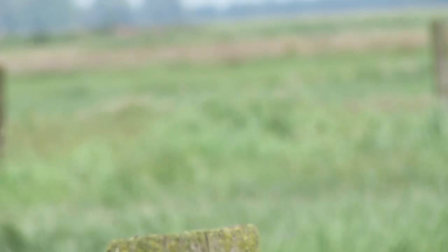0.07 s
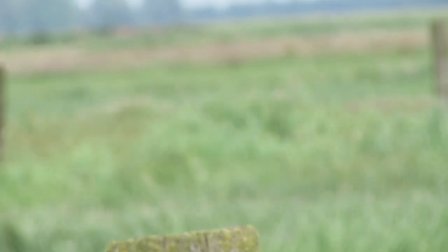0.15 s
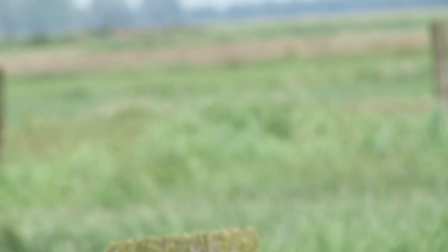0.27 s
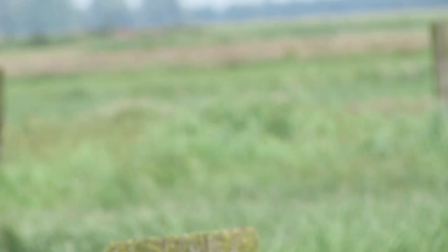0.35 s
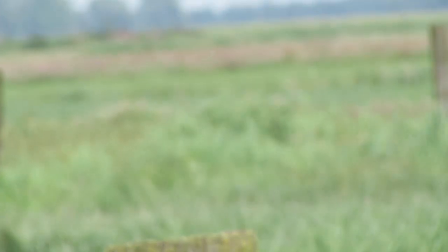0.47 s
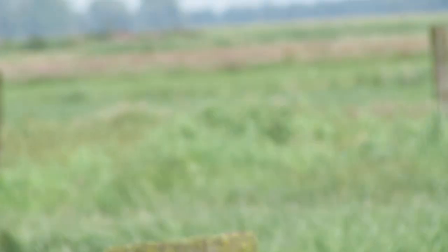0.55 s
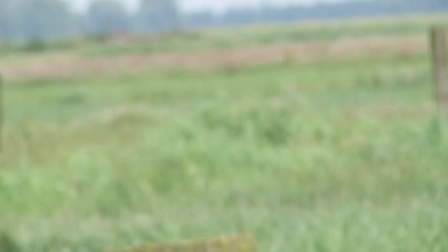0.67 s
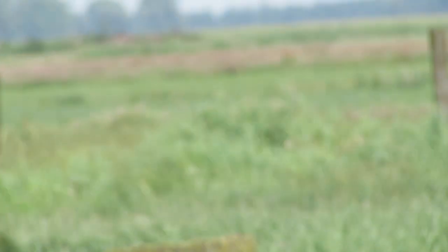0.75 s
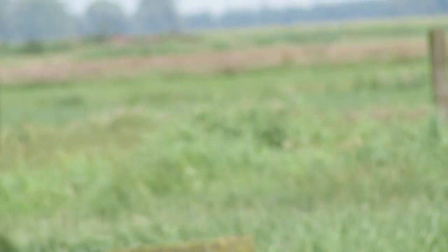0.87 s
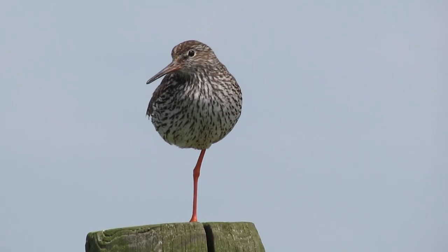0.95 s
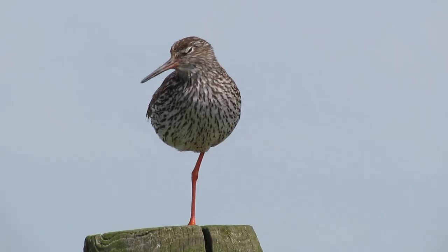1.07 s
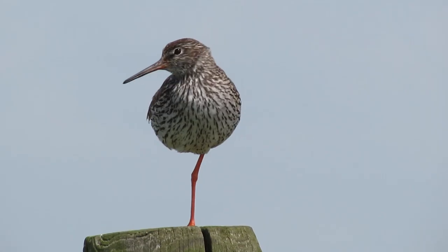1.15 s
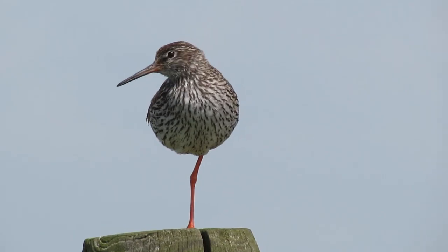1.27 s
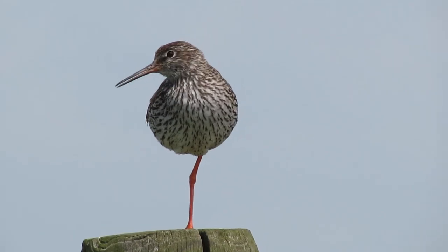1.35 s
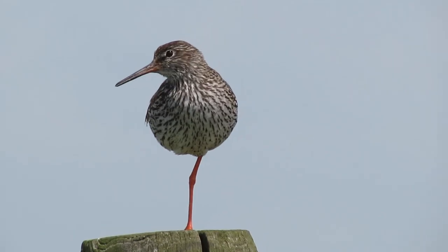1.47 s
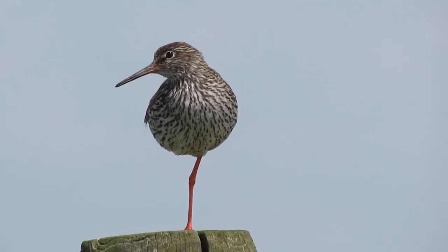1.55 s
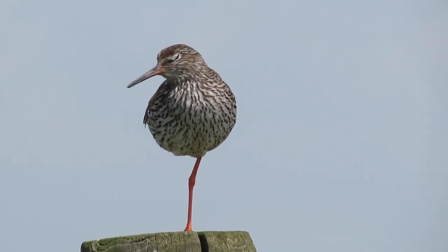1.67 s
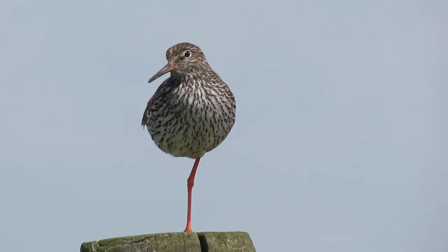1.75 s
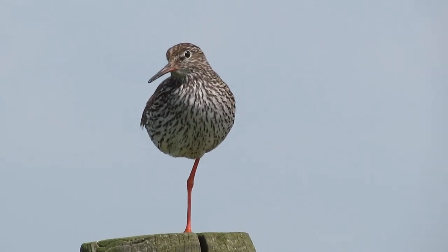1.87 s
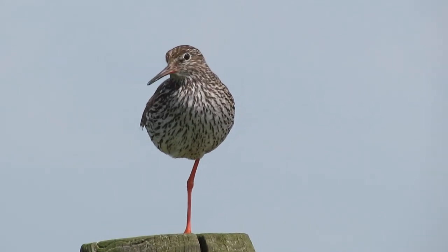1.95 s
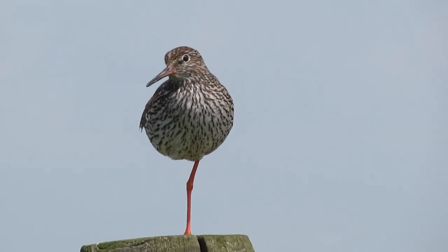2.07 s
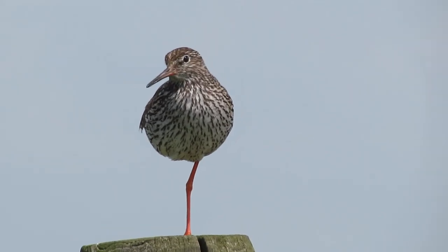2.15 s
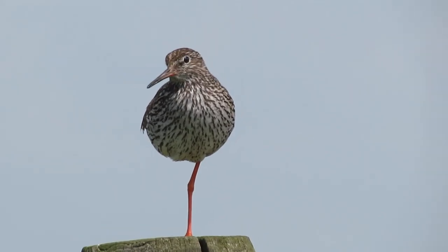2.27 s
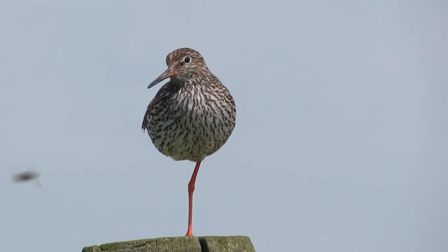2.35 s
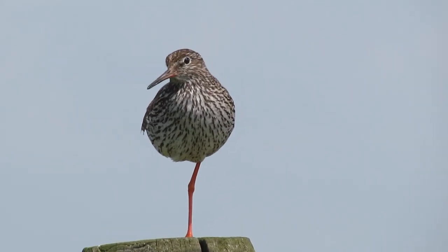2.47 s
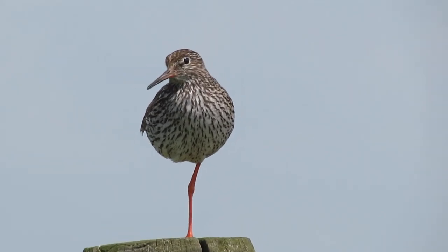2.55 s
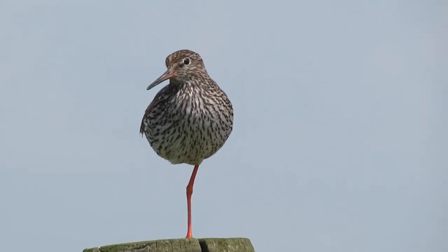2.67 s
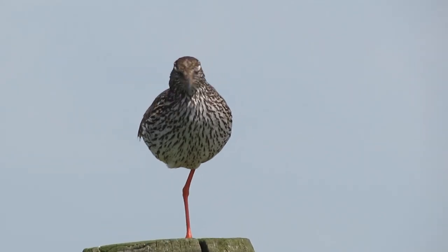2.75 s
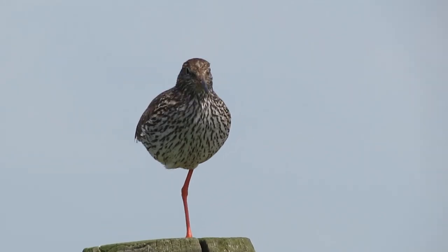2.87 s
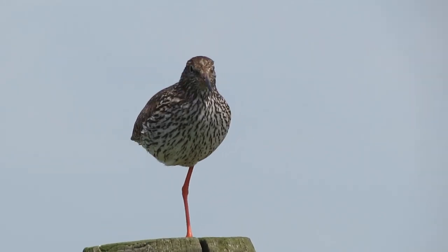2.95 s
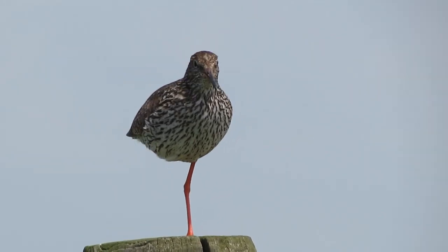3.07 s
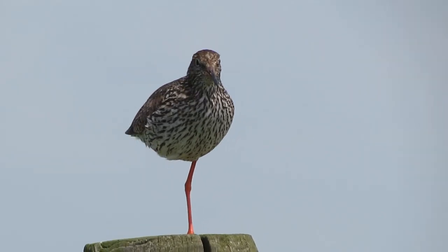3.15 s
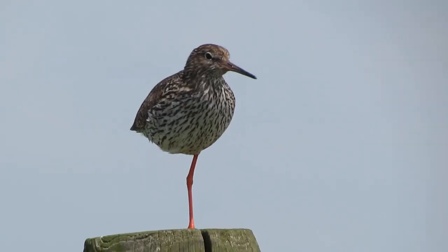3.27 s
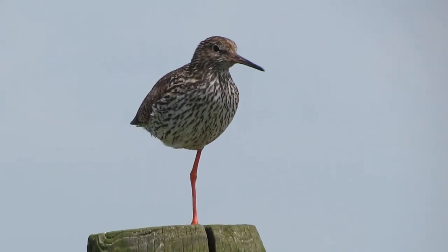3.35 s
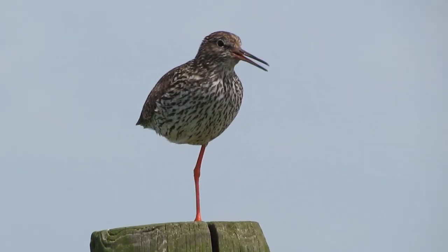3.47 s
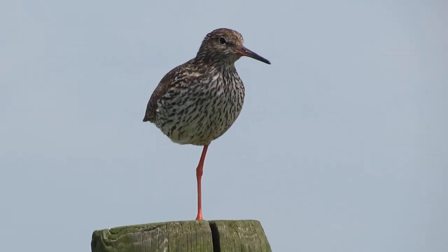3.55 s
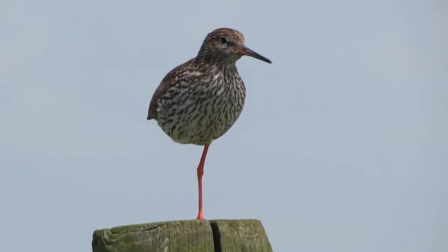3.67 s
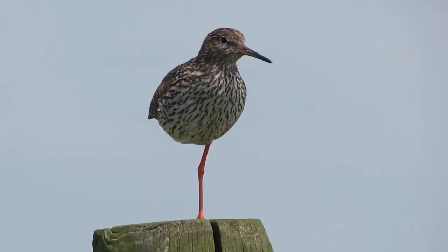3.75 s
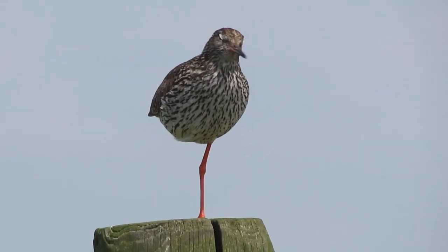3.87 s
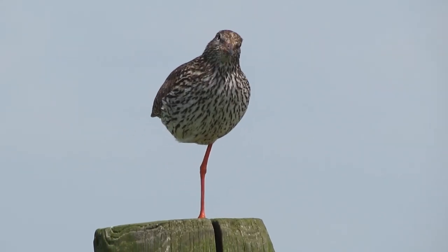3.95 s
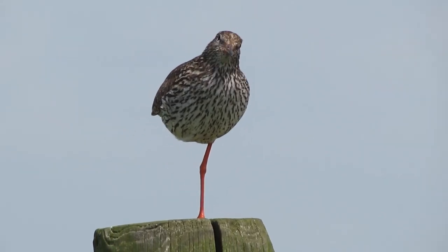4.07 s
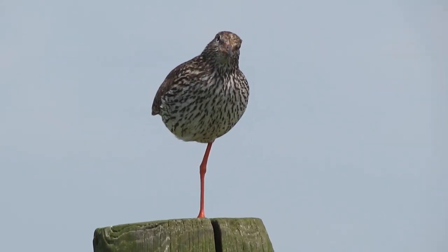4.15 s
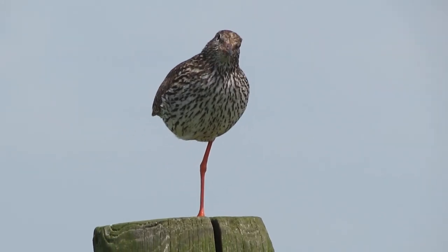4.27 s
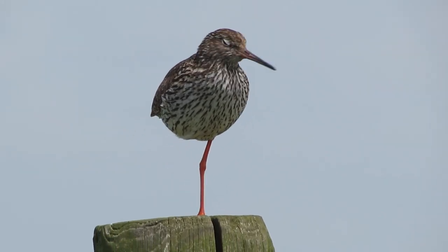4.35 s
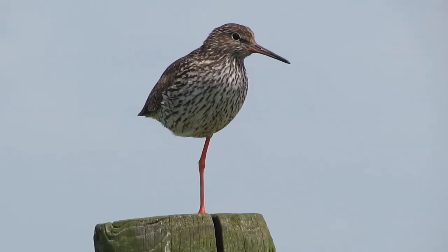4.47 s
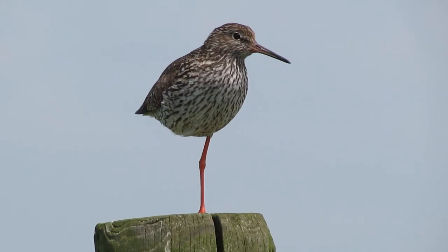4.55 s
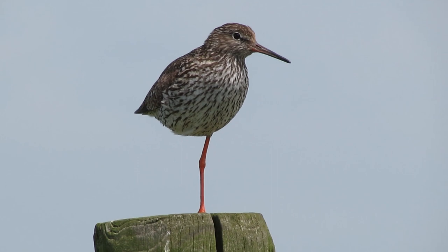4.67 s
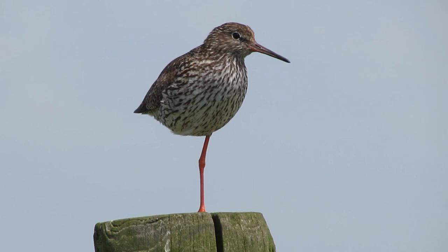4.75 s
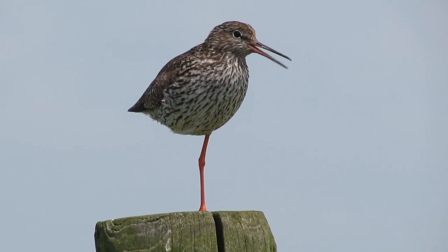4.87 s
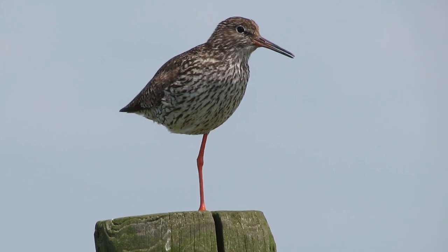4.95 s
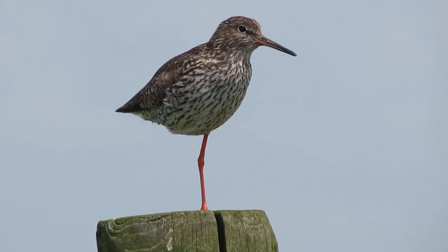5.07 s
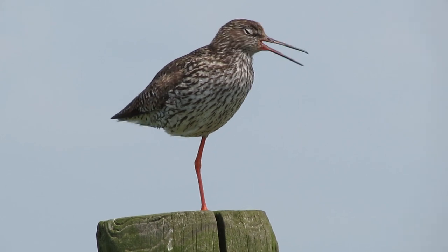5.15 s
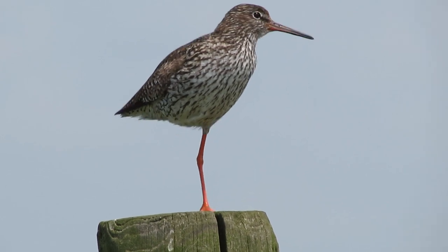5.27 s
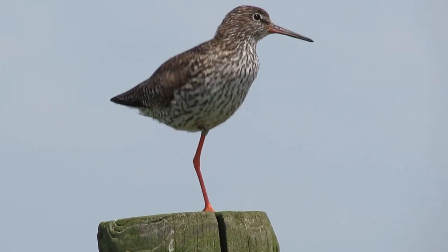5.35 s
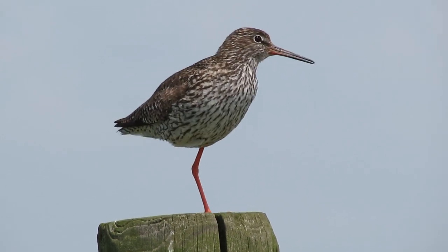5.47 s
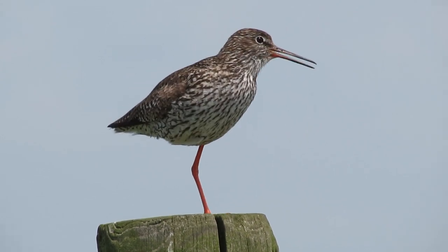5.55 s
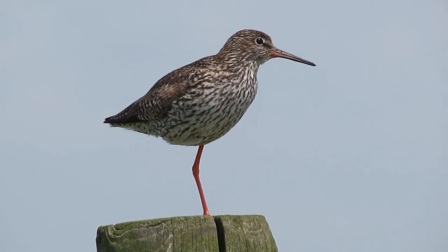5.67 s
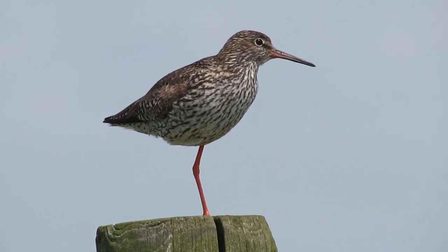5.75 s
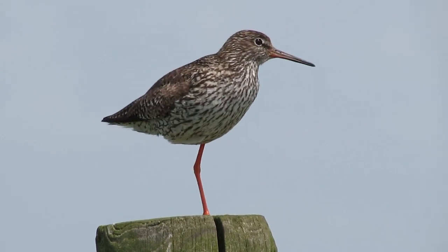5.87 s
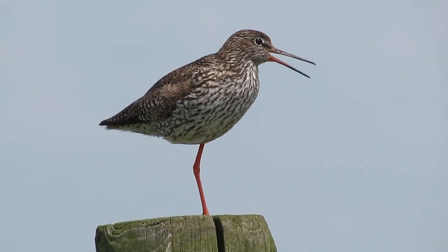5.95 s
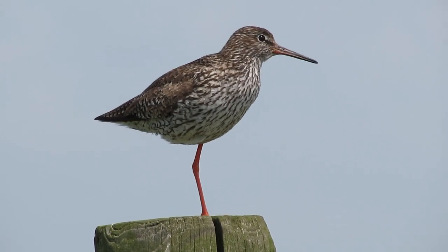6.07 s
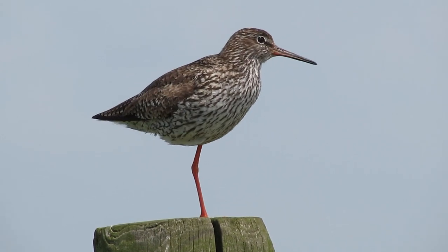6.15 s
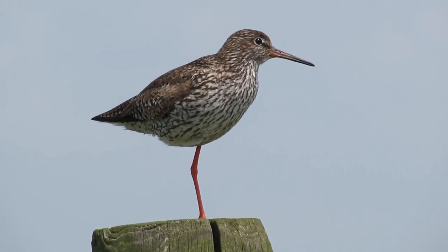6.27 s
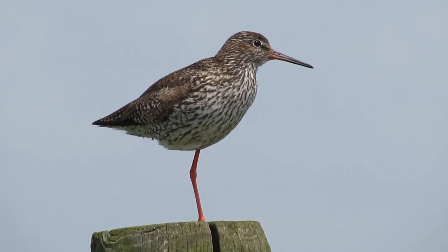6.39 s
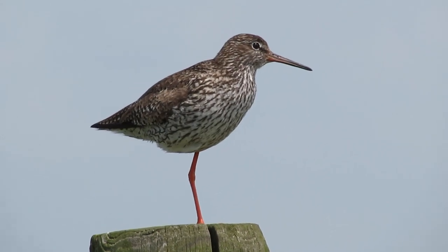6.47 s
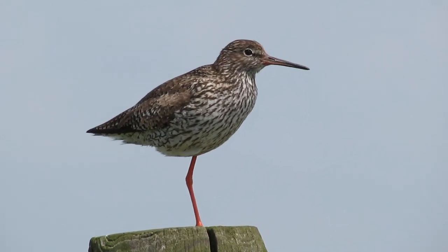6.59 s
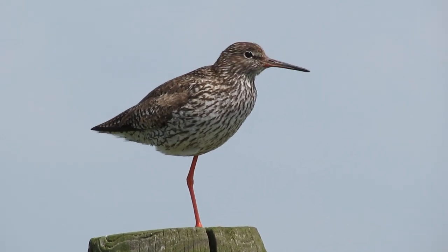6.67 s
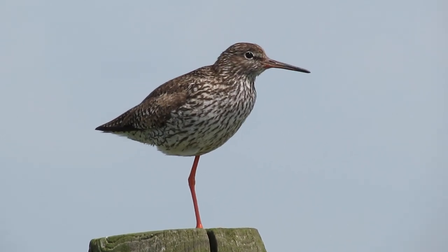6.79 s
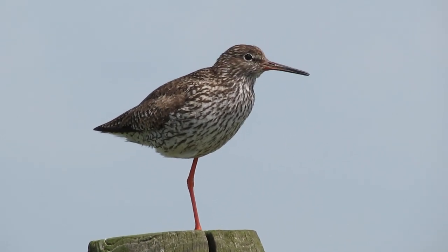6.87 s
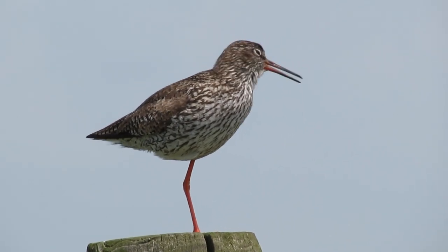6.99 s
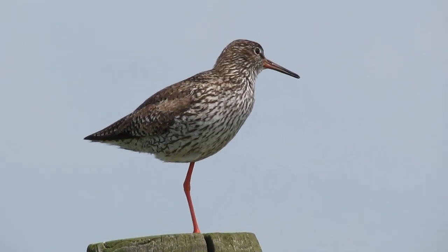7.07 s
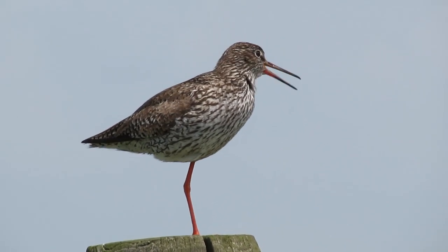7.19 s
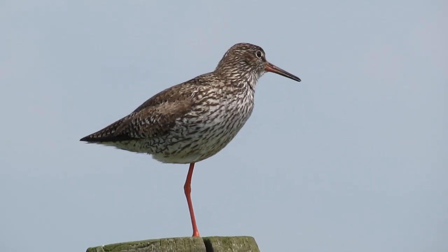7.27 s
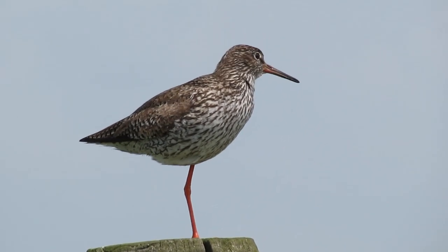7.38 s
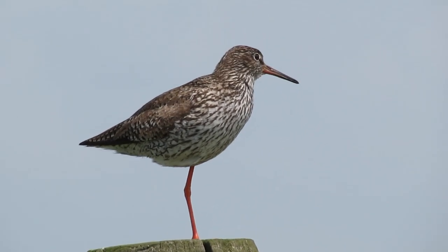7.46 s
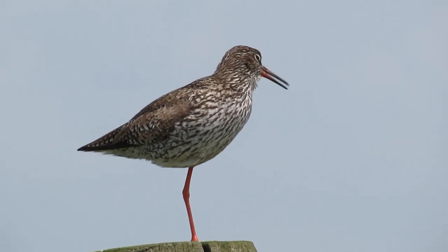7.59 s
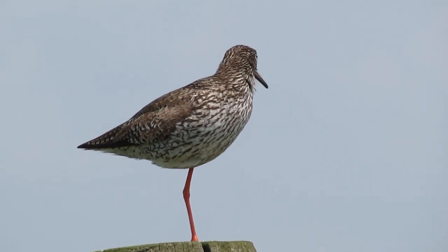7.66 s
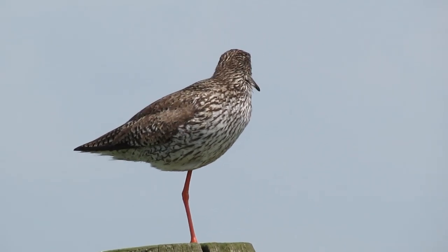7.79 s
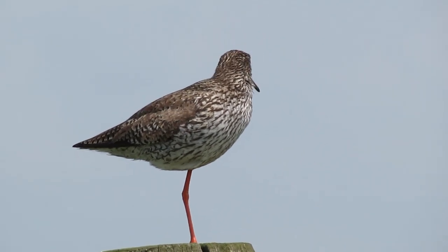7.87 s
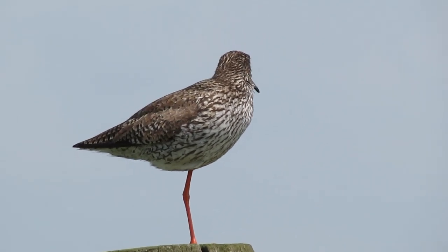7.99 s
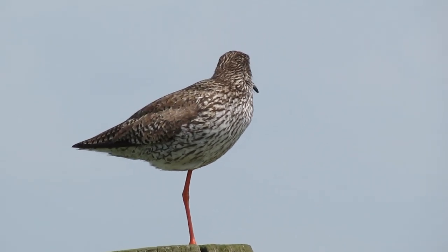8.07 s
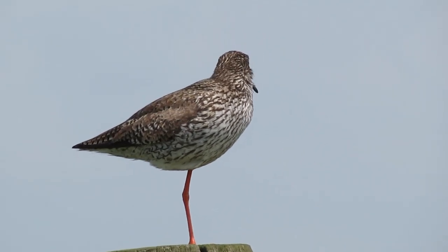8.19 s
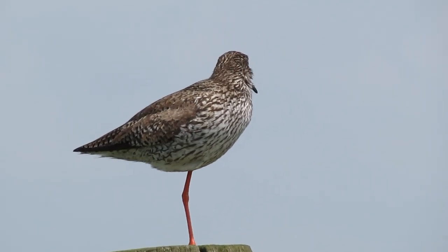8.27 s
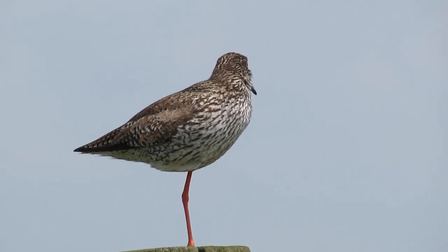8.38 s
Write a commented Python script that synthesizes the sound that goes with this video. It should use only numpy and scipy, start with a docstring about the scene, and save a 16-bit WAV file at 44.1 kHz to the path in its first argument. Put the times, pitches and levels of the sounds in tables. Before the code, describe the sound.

Loud, clipped, high wader alarm notes repeat at uneven gaps, each a quick rasp snapping into a falling whistle, above a faint breezy meadow.

```python
"""Light wind, a far engine and a soft hiss open the scene, and almost at once a redshank calls from a fence post.
It gives twelve sharp alarms: a rising rasp that breaks up, a thin squeak, and a loud falling whistle.
Far meadow birds slur, trill and chirp behind it, and one dry tick sounds midway.
The voices are sliding sine waves; the rasp also rings a throat of resonances. Wind and hiss are coloured
noise, the engine is two low tones, and the tick is a few dying tones with short bursts of noise."""
import sys
import numpy as np
from scipy import signal
from scipy.fft import rfft, irfft
from scipy.io import wavfile

SR = 44100
rng = np.random.default_rng(int(sys.argv[2]) if len(sys.argv) > 2 else 0)


def materialize(psi):
    """Save the field psi as 16-bit PCM at rate SR to the path in sys.argv[1].

    A 1-D psi becomes a single channel; in a 2-D psi each row is a channel.
    """
    bounded = np.clip(np.atleast_2d(psi).T, -1, 1)
    quanta = np.round(bounded * 32767).astype(np.int16)
    wavfile.write(sys.argv[1], SR, quanta)


N = 371322
TIME = np.arange(N) / SR  # s
TOP_HZ = 15200  # upper limit of the sound

# wind over the meadow, its tone colour: f/Hz, relative level/dB
WIND_COLOUR = [(10, -25.5), (25, -4), (65, -0.5), (105, -5), (170, -0.5), (280, -7.5), (420, -12),
               (750, -17), (1050, -16.5), (1500, -24), (2200, -26.5), (4000, -57.5)]
# hiss, its tone colour: f/Hz, relative level/dB
HISS_COLOUR = [(500, -26), (1000, -4), (1600, -4.5), (2700, -2), (4000, -2.5), (5500, -3), (8000, -6.5),
               (12000, -12), (13500, -16.5), (15000, -38.5)]
# breeze: t/s, level of its rush/dB
BREEZE_LEVEL = [(0, -62.5), (.9, -60), (1.8, -58), (2.6, -56), (3.1, -60.5), (3.5, -54.5), (4.25, -51),
                (4.8, -57.5), (6.3, -60), (6.8, -56.5), (8.42, -57)]
# far engine: t/s, firing rate f/Hz, level/dB
ENGINE_COURSE = [(0, 64.14, -62), (.9, 66.37, -60), (1.1, 64.94, -55), (4, 64.69, -62.5),
                 (6.4, 67.43, -60.5), (7.45, 66.95, -55), (7.9, 85.1, -53), (8.42, 77.27, -57)]
# alarm calls: start t/s, wait until whistle t/s, whistle length t/s, squeak f/Hz, whistle start f/Hz,
#  rasp level/dB (before the throat), whistle level/dB, whistle fade/dB, overtone boost/dB, left minus right/dB
ALARM_CALLS = [ (0.0392, 0.02515, 0.02495, 5248, 3486, -31.5, -25.5, 7, -18, -9),
               (1.081, 0.02996, 0.0232, 5257, 2906, -26.5, -16, 17.5, -10.5, -3.5),
               (1.485, .0262, 0.0309, 5230, 2924, -25, -22, 14.5, 0.5, -2),
               (3.110, .0262, 0.0192, 5239, 2855, -23.5, -19.5, 8, -2.5, -2.5),
               (3.554, 0.0315, 0.0223, 5068, 2895, -24.5, -21, 8, -3, -3),
               (4.97, 0.0283, 0.0318, 5089, 2820, -24.5, -21.5, 9.5, -1.5, -3),
               (5.243, 0.0285, 0.0412, 5010, 2831, -23.5, -19, 12, -1, -3.5),
               (5.623, 0.0263, 0.0327, 5015, 2958, -25.5, -15.5, 14, -3, -2.5),
               (6.041, .0282, 0.0236, 5080, 2944, -22, -14.5, 13, 0, -3),
               (7.0358, 0.02516, 0.03635, 5007, 2867, -22, -17.5, 9, 2, -3),
               (7.2826, 0.02643, 0.0399, 4978, 2946, -25.5, -11.5, 13.5, -3, -0.5),
               (7.67, 0.02797, 0.0255, 4941, 2941, -24, -10, 18.5, -2.5, -1.5)]
# course of one rasp: share of its length (0-1), pitch f/Hz, relative level/dB, roughness (0-1)
RASP_COURSE = [(0, 887.5, -12, 0.05), (.2, 991.5, -3.5, .05), (.38, 1206, -4.5, 0.02), (.5, 1397, 1.5, .14),
               (.6, 1735, 2.5, 0.32), (.72, 2178, -2, 0.08), (1, 2226, -11.5, 0)]
# resonances of throat and open bill: f/Hz, width f/Hz, level/dB
THROAT_RESONANCES = [(1051, 216, -12.5), (2211.7, 267, 1.5), (2780, 310, 4.5), (3598, 421, 1),
                     (4448, 75, 6.5), (5214, 287, -1.5), (6512, 467, 0), (7960, 1110, -6.5),
                     (10330, 3530, -13)]
# the bill points at the microphone, then away: t/s, treble level/dB
BILL_FACING = [(0, 0), (1.5, 0), (3.1, 3.5), (5, -2), (8, -3.5)]
# far whistled notes: start t/s, length t/s, start f/Hz, end f/Hz, level/dB before the cut in far_birds,
#  bend (above 0 the slide levels off, below 0 it steepens)
FAR_SLURS = [ (0.139, 0.0287, 3100, 2777, -50, 0.5), (0.674, 0.041, 3300, 3067, -52, -.5),
             (1.343, 0.042, 4116, 4375, -52, 4.5), (1.772, 0.1256, 4020, 3650, -57.5, -6.5),
             (1.826, 0.0224, 3020, 3118, -45, 0.5), (1.858, 0.0193, 3020, 3110, -44.5, -2),
             (1.868, .053, 4620, 4220, -56.5, -1.5), (2.015, 0.13, 4390, 3706, -50.5, 3),
             (2.239, .134, 4550, 4220, -58, 0.23), (3.295, .14, 4970, 3980, -59.5, 2.5),
             (3.498, 0.148, 4900, 3896, -58, 1), (3.7, 0.0656, 3565, 3290, -54.5, -1),
             (4.233, 0.16, 4030, 3680, -60, -2), (4.514, 0.129, 4300, 3658, -54, 1.5),
             (4.612, 0.111, 3470, 3439, -55, 2.5), (5.471, 0.05, 3450, 2148, -44, 0.42),
             (5.504, 0.15, 2400, 2208, -47, 8.5), (6.572, .136, 4850, 3870, -61, 3.5),
             (7.152, 0.046, 4580, 4340, -55.5, 0.04), (7.24, 0.067, 3480, 3500, -53.5, 10),
             (7.778, .183, 4650, 3947, -59.5, 2.5), (7.994, .158, 4700, 3835, -50.5, 2),
             (8.088, 0.18, 3100, 2190, -58.5, 7), (8.318, .124, 4600, 3640, -55.5, 2)]
# far trills: start t/s, length t/s, start f/Hz, end f/Hz, level/dB before the cut in far_birds
FAR_TRILLS = [ (0.756, 0.202, 3520, 3440, -52), (3.43, 0.077, 4250, 3990, -50),
              (3.851, .143, 4350, 4316, -54.5), (5.186, 0.111, 4500, 4612, -49),
              (6.156, 0.0766, 3520, 3320, -52.5), (6.758, .072, 4520, 4550, -54)]
# runs of one repeated chirp: start t/s, number of notes, period t/s, note length t/s, start f/Hz, end f/Hz,
#  level/dB before the cut in far_birds
FAR_CHIRP_RUNS = [(0.262, 3, .133, .076, 4665, 5307, -64), (2.495, 3, 0.087, .055, 2930, 3274, -61.5),
                  (2.526, 3, .09, .035, 3263, 2190, -55.5)]
# parts of the dry tick: start t/s, ring f/Hz, decay t/s, level/dB
TICK_PARTS = [(4.8728, 3190, 0.00055, -32.5), (4.8722, 910, 0.00085, -32), (4.8765, 231.6, 0.0019, -34.5)]

RUMBLE_DB = -57
HISS_DB, HISS_STEP_S, HISS_BEFORE_DB, HISS_RAMP_S = -58, 0.931, -63.5, 0.045  # the hiss steps up once, early on
LEAP_SHARE = .73  # the rasp leaps to the squeak this far on the way to the whistle
SQUEAK_DB, HUSK_DB = -5.5, -11.5  # squeak and the whistle's rush of air, relative to the rasp
SQUEAK_SAG, SQUEAK_OVERLAP_S = .03, .003  # share of pitch lost along the squeak; extra length
SETTLE_RATIO = .499  # the whistle settles an octave under the squeak
WHISTLE_ATTACK_S, WHISTLE_RELEASE_S = 0.00568, 0.00438
TRILL_HZ, TRILL_UNEVEN = 45.9, 0.193  # beat rate; how unsteady it is, as a share
TRILL_DEPTH, TRILL_SWING = 0.904, 0.038  # shares of level and pitch
TRILL_BEND = 2.8  # trills and twitter slide quickly at first and then level off
TWITTER_PER_S, TWITTER_DB = 6.7, -63  # notes per second; level before the cut in far_birds
TWITTER_HZ, TWITTER_OCTAVES = 4365, .25  # middle pitch; random shift up or down
TWITTER_S, TWITTER_SLIDE_OCTAVES = 0.0367, 0.1117  # middle length (half to double); largest slide


def undb(db):
    """Decibels to gain."""
    return 10 ** (np.asarray(db) / 20)


def unit(x):
    """Scale to an rms (average strength) of 1."""
    return x / np.sqrt(np.mean(x ** 2))


def shape(hz, points):
    """Gain at the given frequencies, read from a list of (f/Hz, level/dB)."""
    f, db = np.transpose(points)
    return undb(np.interp(np.log(np.maximum(hz, 1)), np.log(f), db))


def colour(x, points):
    """Filter by a list of (f/Hz, level/dB)."""
    n = x.shape[-1]
    hz = np.arange(n // 2 + 1) * SR / n
    return irfft(rfft(x) * shape(hz, points), n)


def walk(rate, size):
    """Smooth chance with spread near 1, heading for a new value `rate` times a second."""
    place = np.arange(size) * rate / SR
    return np.interp(place, np.arange(size), rng.standard_normal(size))


def gate(t, length, rise, fall):
    """A note's outline with rounded start and end."""
    opening = np.sin(np.pi / 2 * np.clip(t / rise, 0, 1))
    closing = np.sin(np.pi / 2 * np.clip((length - t) / fall, 0, 1)) ** 2
    return opening * closing


def glide(share, start_hz, end_hz, bend):
    """Exponential slide between two pitches."""
    return start_hz + (end_hz - start_hz) * np.expm1(-bend * share) / np.expm1(-bend)


def turn(hz):
    """Phase of a moving pitch."""
    return 2 * np.pi * np.cumsum(hz) / SR


def add(out, start, x):
    """Mix x in at a start time in seconds."""
    i = max(int(start * SR), 0)
    out[..., i:i + x.shape[-1]] += x[..., :max(N - i, 0)]


def meadow(x, decay, wet_db):
    """Grass and posts scatter a short dull tail, different on each side."""
    t = np.arange(SR // 3) / SR
    fading = np.exp(-t / decay) + 0.0091 * np.exp(-t / 0.13)
    scatter = rng.standard_normal((2, len(t))) * fading * (t > .004)
    scatter = colour(unit(scatter) / np.sqrt(len(t)), [(3000, -1), (5000, -3.5), (10000, -6)])
    return undb(wet_db) * signal.fftconvolve(x[None], scatter, axes=1)[:, :N]


def stereo_noise(points, side_db):
    """Coloured noise: a shared middle with rms 1, plus a part that is opposite on the two sides."""
    mid, side = (unit(colour(rng.standard_normal(N), points)) for _ in range(2))
    return mid + undb(side_db) * side * np.array([[1], [-1]])


def below(x, hz):
    """Keep only what lies under a frequency, without delay."""
    return signal.sosfiltfilt(signal.butter(3, hz, fs=SR, output="sos"), x)


def layer(x, db):
    """Set the level of the sound shared by both sides."""
    return x / x.mean(axis=0).std() * undb(db)


def wind():
    """Noise split into a flickering rumble, a rush that swells with the breeze, and a rustle of grass."""
    noise = stereo_noise(WIND_COLOUR, side_db=4)
    low, body = below(noise, 119.1), below(noise, 331.6)
    rush_db = np.interp(TIME, *np.transpose(BREEZE_LEVEL))
    rumble = layer(low, RUMBLE_DB + 1.63 * walk(8, N))
    rush = layer(body - low, rush_db + 1.03 * walk(12, N))
    grass = layer(noise - body, -59.8 + 0.657 * walk(4.5, N))
    return (rumble + rush + grass) * undb([[-.5], [.5]])  # a touch stronger on the right


def hiss():
    """Coloured noise that steps up once and is steady before and after."""
    level_db = np.interp(TIME, [HISS_STEP_S, HISS_STEP_S + HISS_RAMP_S], [HISS_BEFORE_DB, HISS_DB])
    return stereo_noise(HISS_COLOUR, side_db=-0.5) * undb(level_db)


def motor():
    """A far engine drones and speeds up near the end; only its two lowest orders carry this far."""
    s, *columns = np.transpose(ENGINE_COURSE)
    hz, db = (np.interp(TIME, s, c) for c in columns)
    phase = turn(hz * (1 + 0.01234 * walk(11, N)))
    orders = np.sin(phase) + undb(-9) * np.sin(2 * phase)
    return undb(db + 2 * walk(5, N)) * orders


def throat(x):
    """Every pulse rings the resonances of the throat for up to a few milliseconds."""
    x = np.pad(x, (0, 256))  # room for the ringing to die away
    out = np.zeros(len(x))
    for k, (hz, width, db) in enumerate(THROAT_RESONANCES):
        ringing = signal.lfilter(*signal.iirpeak(hz, hz / width, fs=SR), x)
        out += (-1) ** k * undb(db) * ringing  # neighbours have opposite signs
    return out


def turbulence(size):
    """Rushing air: partly shaped by the throat, partly bright at the bill."""
    noise = rng.standard_normal(size)
    return throat(noise)[:size] + undb(-18.0) * noise


def rasp(length):
    """The syrinx (voice organ) starts low and rich, climbs, and breaks into uneven cycles that excite the throat."""
    t = np.arange(int(length * SR)) / SR
    share, *columns = np.transpose(RASP_COURSE)
    hz, db, rough = (np.interp(t / length, share, c) for c in columns)
    phase = turn(hz * (1 + rough * walk(2615.4, len(t))))
    buzz = sum(np.cos(k * phase) * k ** -.85 * (k * hz < TOP_HZ) for k in range(1, 13))
    breath = 2.57 * rough * rng.standard_normal(len(t))
    return throat((buzz + breath) * undb(db - 2.5) * gate(t, length, 0.00098, 0.00225))


def squeak(length, hz, low_hz):
    """One side of the syrinx sings a thin high note; the other starts up beneath it and the two mix."""
    t = np.arange(int(length * SR)) / SR
    phase = turn(hz * (1 + SQUEAK_SAG * (.5 - t / length) + 0.0077 * walk(1690, len(t))))
    high = np.sin(phase) + undb(-10.5) * np.sin(2 * phase)
    low = np.sin(turn(low_hz * (1 + 0.0807 * walk(1852, len(t))))) * (0.442 + t / length)
    mixed = undb(-5) * low * (1 + 0.64 * np.sin(phase))  # the product gives sum and difference tones
    return (high + mixed + undb(-12) * turbulence(len(t))) * gate(t, length, 0.0037, 0.00418)


def whistle(length, start_hz, end_hz, db, fade_db, overtones_db, husk_db):
    """A nearly pure note sinks and fades as the air pressure drops; the bill favours certain overtones."""
    t = np.arange(int(length * SR)) / SR
    hz = glide(t / length, start_hz, end_hz, 2.37) * (1 + 0.00203 * walk(1223, len(t)))
    phase = turn(hz)
    # the second and third harmonics are strongest near 5200 and 8100 Hz
    second = undb(-22.0) / np.hypot(1, (2 * hz - 5200) / 250)
    third = undb(-17.5) / np.hypot(1, (3 * hz - 8100) / 330)
    overtones = second * np.sin(2 * phase) + third * np.sin(3 * phase) + undb(-38) * np.sin(4 * phase)
    note = np.sin(phase) * undb(2.02 * walk(260, len(t)))
    note = note + undb(overtones_db + 2.452 * walk(500, len(t))) * overtones
    husk = undb(husk_db) * np.exp(-t / 0.027) * turbulence(len(t))
    outline = undb(-fade_db * t / length) * gate(t, length, WHISTLE_ATTACK_S, WHISTLE_RELEASE_S)
    return (undb(db) * note + husk) * outline


def redshank():
    """Rasp, squeak and whistle follow each other without a gap."""
    out = np.zeros((2, N))
    for (s, drop, length, squeak_hz, start_hz, rasp_db, db, fade_db,
         overtones_db, pan_db) in ALARM_CALLS:
        leap = LEAP_SHARE * drop
        bright_db = np.interp(s, *np.transpose(BILL_FACING))
        end_hz = SETTLE_RATIO * squeak_hz
        call = np.zeros(SR // 8)
        add(call, 0, undb(rasp_db) * rasp(leap + 0.001049))
        high = squeak(drop - leap + SQUEAK_OVERLAP_S, squeak_hz, start_hz)
        add(call, leap - .001, undb(rasp_db + SQUEAK_DB) * high)
        add(call, drop, whistle(length, start_hz, end_hz, db, fade_db, overtones_db, rasp_db + HUSK_DB))
        # the bill beams the treble
        call = colour(call, [(2800, 0), (4500, 0.22 * bright_db), (10000, bright_db)])
        add(out, s, undb(np.array([[pan_db], [-pan_db]]) / 2) * call)
    # the left microphone is brighter and is reached one sample earlier
    left = colour(out[0], [(2700, 0.38), (5000, 0.91), (8000, 3.9)])
    right = np.roll(colour(out[1], [(2700, 0.88), (5000, -0.54), (8000, -0.86)]), 1)
    return np.array([left, right]) + meadow(out.mean(axis=0), decay=0.01197, wet_db=-7)


def far_note(length, start_hz, end_hz, db, bend, trilled=False):
    """A thin sliding note; in a trill an uneven beat chops it and sweeps its pitch up through each pulse."""
    t = np.arange(int(length * SR)) / SR
    hz = glide(t / length, start_hz, end_hz, bend) * (1 + 0.00395 * walk(201, len(t)))
    outline = undb(db) * gate(t, length, 0.0111, 0.0128)
    if trilled:
        beat = turn(TRILL_HZ * (1 + TRILL_UNEVEN * walk(44.2, len(t))))
        hz = hz * (1 + TRILL_SWING * np.sin(beat))
        outline = outline * (1 - TRILL_DEPTH * (1 - np.cos(beat / 2) ** 4))
    return outline * np.sin(turn(hz))


def twitter():
    """Faint short notes at random times, each with a random pitch, slide and length; rising ones are trilled."""
    out = np.zeros(N)
    count = int(TWITTER_PER_S * N / SR)
    for when, pitch, slide, length in rng.uniform(-1, 1, (count, 4)):
        octaves = TWITTER_OCTAVES * pitch + TWITTER_SLIDE_OCTAVES * np.array([0, slide])
        start_hz, end_hz = TWITTER_HZ * 2 ** octaves
        note = far_note(TWITTER_S * 2 ** length, start_hz, end_hz, TWITTER_DB, TRILL_BEND, trilled=slide > 0)
        add(out, (when + 1) / 2 * N / SR, note)
    return out


def low_call():
    """One low, soft note: a wavering tone and its octave, equally strong."""
    t = np.arange(int(.17 * SR)) / SR
    phase = turn(755 * (1 + 0.008 * walk(43, len(t))))
    return undb(-57.5) * (np.sin(phase) + np.sin(2 * phase)) * gate(t, 0.164, 0.065, 0.072)


def far_birds():
    """Thin slurs, trills and chirps from across the meadow, faint twitter, and one low, soft call."""
    out = twitter()
    for s, *note in FAR_SLURS:
        add(out, s, far_note(*note))
    for s, *note in FAR_TRILLS:
        add(out, s, far_note(*note, bend=TRILL_BEND, trilled=True))
    for s, count, period, *note in FAR_CHIRP_RUNS:
        for k in range(round(count)):
            add(out, s + k * period, far_note(*note, bend=-0.53))
    add(out, 2.32, low_call())
    return undb(-2.5) * out + meadow(out, decay=0.0113, wet_db=-8.0)


def tick():
    """One small dry click with a dull knock behind it: dying tones, each with a short burst of noise."""
    out, t = np.zeros(N), np.arange(SR // 40) / SR
    for s, hz, decay, db in TICK_PARTS:
        ring = np.sin(2 * np.pi * hz * t) * np.exp(-t / decay)
        burst = rng.standard_normal(len(t)) * np.exp(-t / 0.0012)
        crack = colour(burst, [(hz, 0), (4 * hz, -9), (20 * hz, -30)])
        add(out, s, undb(db) * (ring + crack))
    return out + meadow(out, decay=0.0044, wet_db=-8)


def scene():
    """The near bird over the sounds of the meadow."""
    return wind() + hiss() + motor() + redshank() + far_birds() + tick()


def record(dry):
    """A steep filter cuts everything above the upper limit."""
    return signal.sosfilt(signal.ellip(8, .2, 70, TOP_HZ, fs=SR, output="sos"), dry)


dry = scene()
out = record(dry)
materialize(out)
```